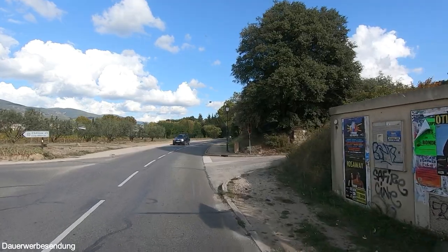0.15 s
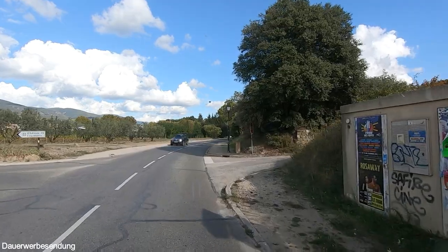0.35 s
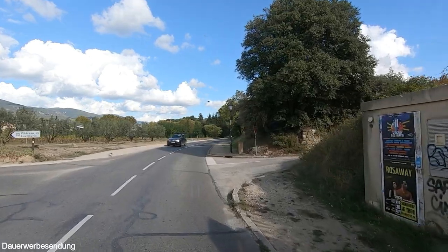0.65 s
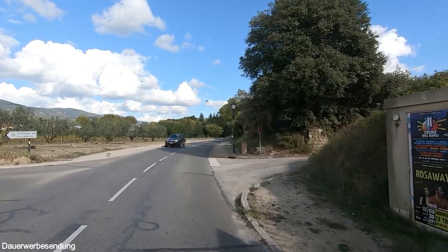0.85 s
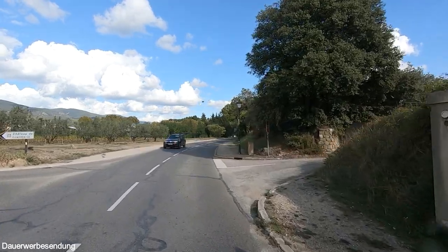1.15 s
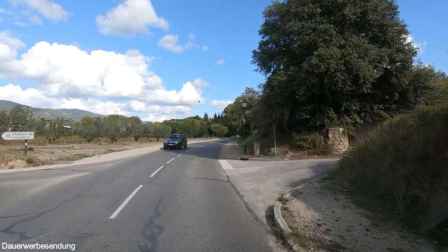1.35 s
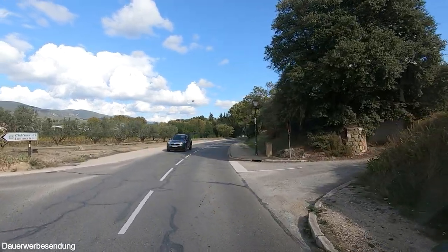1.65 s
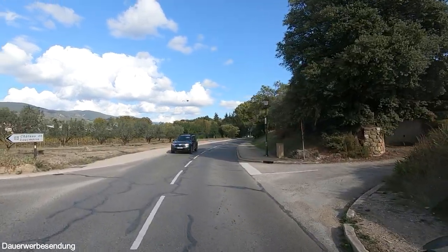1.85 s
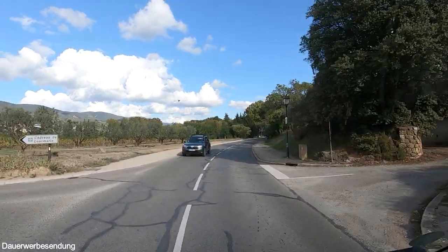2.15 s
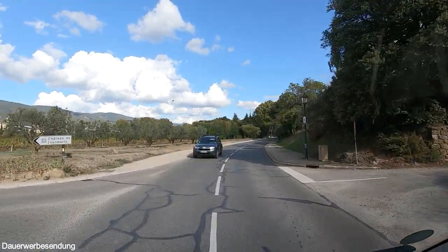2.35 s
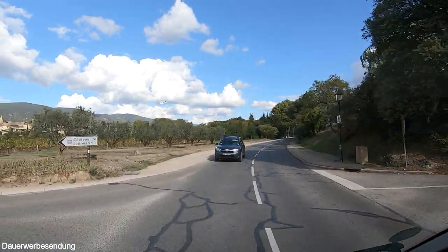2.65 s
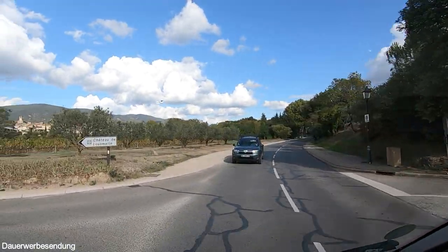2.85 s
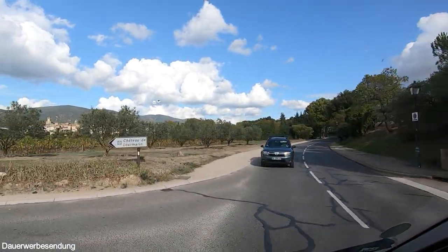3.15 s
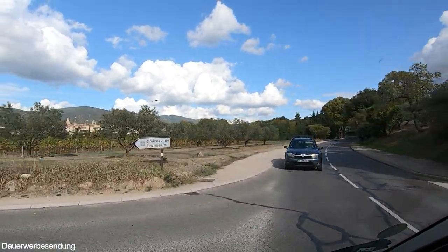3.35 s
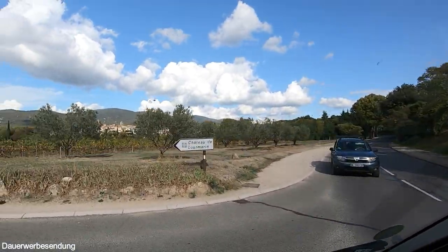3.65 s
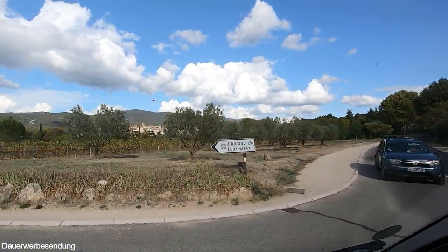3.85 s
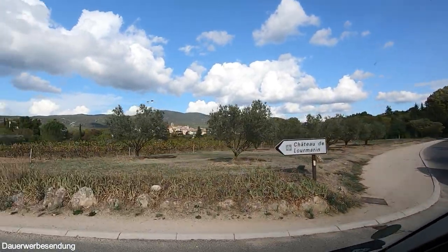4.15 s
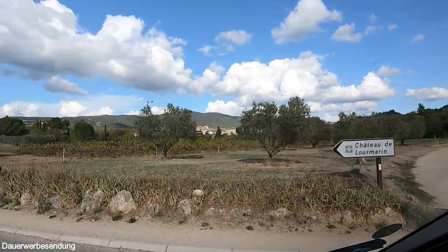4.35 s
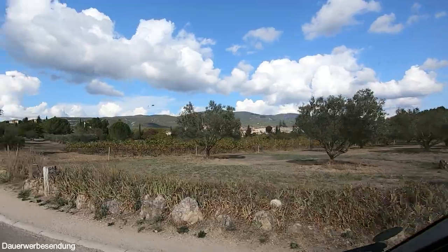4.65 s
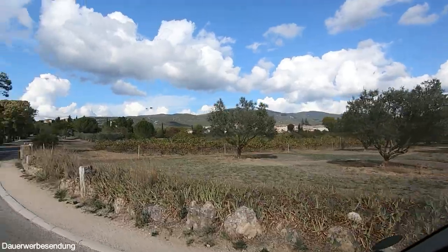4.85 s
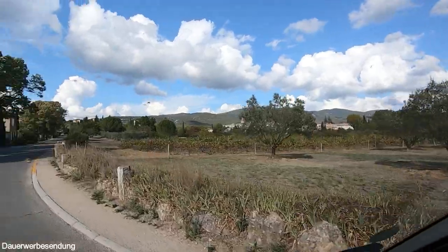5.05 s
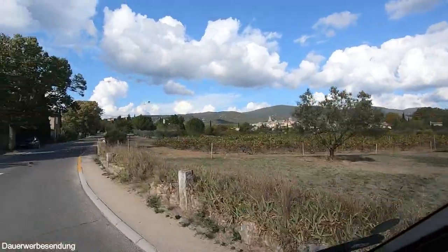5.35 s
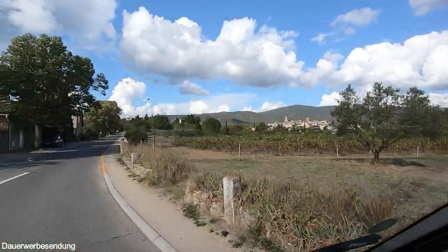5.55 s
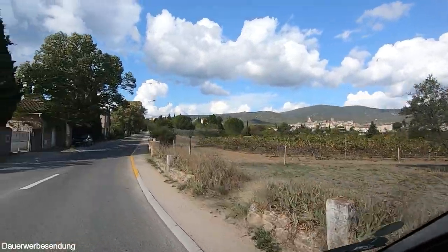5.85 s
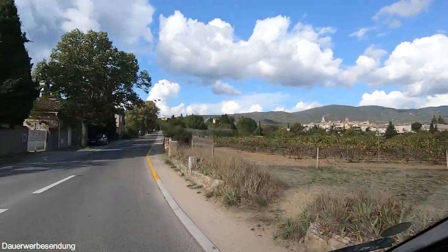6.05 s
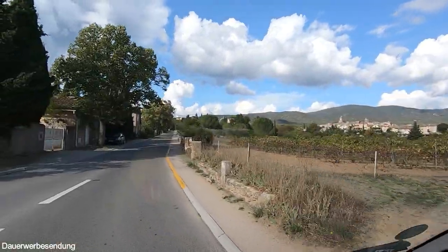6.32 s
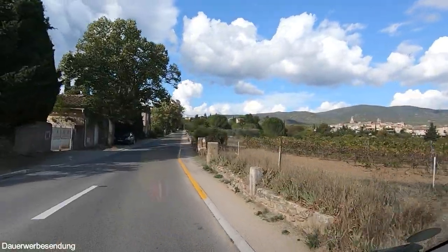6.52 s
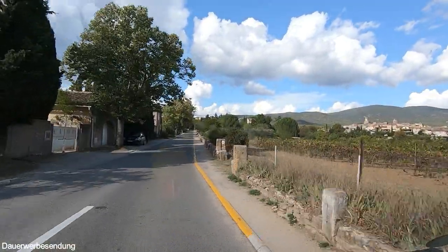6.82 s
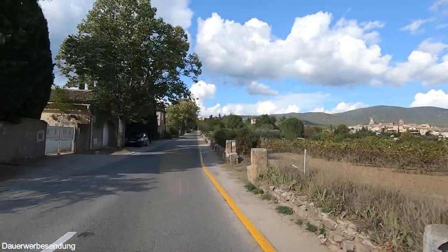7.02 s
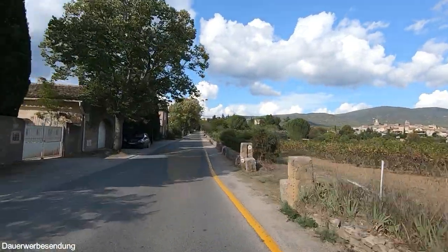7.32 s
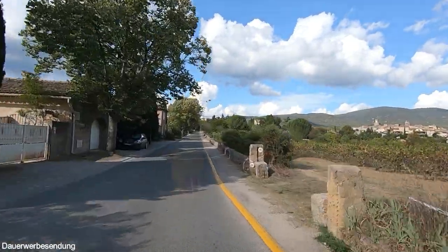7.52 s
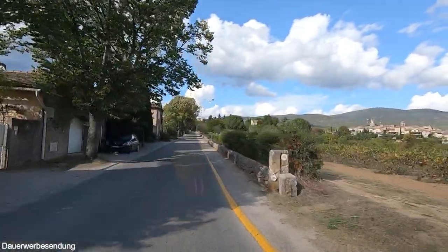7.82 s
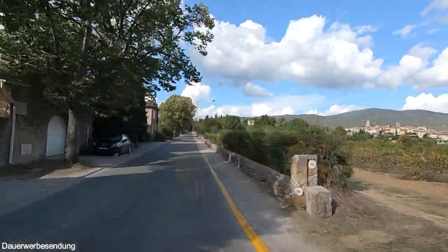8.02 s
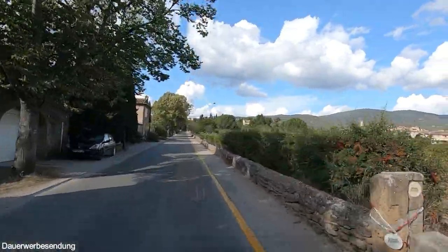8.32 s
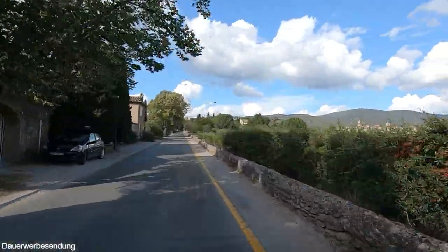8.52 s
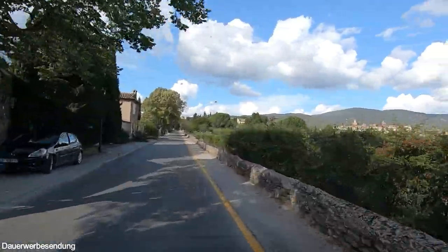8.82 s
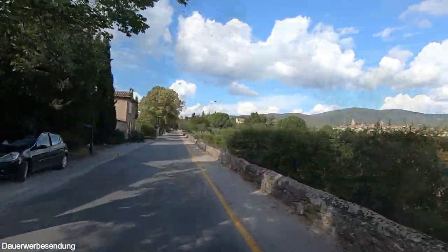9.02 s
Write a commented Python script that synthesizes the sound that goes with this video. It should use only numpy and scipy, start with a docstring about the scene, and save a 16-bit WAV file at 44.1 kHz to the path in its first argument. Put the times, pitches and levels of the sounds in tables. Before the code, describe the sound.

One close microphone in a rattling van cab. The engine pulls modestly, then coasts through a bend beneath boomy tyre rumble. Strong and weak indicator ticks alternate briskly, with loose fittings knocking and cupboards thudding, busiest before the ticking ends. Afterwards the engine climbs to a strong low growl, then drops back as bumps and road noise continue.

```python
"""Inside the cab of a van: a four-cylinder engine pulls, coasts through a bend, pulls harder, then eases off.
From the start the turn indicator, a small ringing sounder, ticks until just after five seconds.
All along, tyres roar as coloured noise, the body rocks over bumps as slow swings, and fittings rattle.
The engine is a set of tones that follow the crank. A limiter ducks everything under the largest low swings."""
import sys
import numpy as np
from scipy import signal
from scipy.io import wavfile
from scipy.ndimage import uniform_filter1d, minimum_filter1d

SR = 44100
rng = np.random.default_rng(int(sys.argv[2]) if len(sys.argv) > 2 else 0)


def to_wav(s):
    """Save 16-bit WAV."""
    ch = np.atleast_2d(s).T  # columns
    pcm = np.round(np.clip(ch, -1, 1) * 32767)  # PCM
    wavfile.write(sys.argv[1], SR, pcm.astype(np.int16))


N = 404838
T = np.arange(N) / SR

# Booms of the cab, shared by engine and tyres. Each row: centre in Hz, width in Hz, gain in dB.
CAB = [(133, 28, 7.5), (178, 26, 12), (215, 26, 13), (250, 28, 12.5), (315, 68, 8), (398, 44, 10.5),
       (508.4, 15.6, 1), (592, 50, -5), (745, 90, -8), (915, 78, -21)]

# Road noise over time. Each row: time in seconds, tyre level in dB, level of hiss and clatter in dB,
# level of the air on top in dB, lift of the rumble over the roar in dB.
ROAD = [(0, -38, -46, -59, 14), (.5, -32.5, -42.5, -58.5, 12.5), (1.02, -32, -43.5, -60.5, 7.5),
        (1.45, -31.5, -40.5, -55, 10.5), (1.7, -31, -39.5, -58, 11.5), (2.3, -30, -35.5, -55, 10),
        (2.9, -31.5, -41.5, -59, 14), (3.8, -31.5, -41, -59.5, 9), (4.35, -28.5, -38.5, -59, 6),
        (4.65, -30.5, -39.5, -53.5, 7), (5.02, -29.5, -34, -51, 10.5), (5.22, -29, -38.5, -54.5, 10.5),
        (5.8, -27.5, -38, -56.5, 4), (6.5, -28.5, -37, -55.5, 9.5), (6.85, -26.5, -36.5, -53.5, -5),
        (7.25, -27.5, -35.5, -53.5, 10.5), (7.85, -28.5, -37.5, -54, 12), (8.2, -29, -39.5, -55.5, 15),
        (8.6, -31.5, -39, -56, 13.5), (9.18, -30, -41, -62, 8.5)]
# Colour of the low tyre rumble. Each row: frequency in Hz, strength in dB per Hz.
RUMBLE = [(25, -8), (36, -6), (55, -4), (87, -13), (157, -21), (250, -20.5), (400, -24.5), (600, -36),
          (1500, -110)]
# Colour of the tyre roar. Each row: frequency in Hz, strength in dB per Hz.
ROAR = [(250, -15.5), (420, -6), (600, -1.5), (920, -4.5), (1150, -9.5), (1600, -27.5), (2500, -66),
        (5000, -110)]
# Colour of the hiss. Each row: frequency in Hz, strength in dB per Hz.
HISS = [(710, -10.5), (1200, 0), (1560, 3), (2070, -3), (2550, -4), (3220, -8), (3760, -7.5), (4750, -13.5),
        (7850, -15), (9500, -22), (12400, -53), (20900, -120)]
# Colour of the thin air on top. Each row: frequency in Hz, strength in dB per Hz.
AIR = [(7000, -21), (9500, -2.5), (11400, -5.5), (13000, -5), (15800, -7.5)]

# Steady rocking of the body on springs, axle and floor. Each row: time in seconds,
# level of the 7 Hz swing in dB, of the 19 Hz shake in dB, of the 30 Hz thud in dB.
ROCKING = [(0, -31, -33, -30), (1, -28, -32, -33), (2.3, -34, -30, -27), (3.4, -24, -26, -25),
           (4.3, -34, -25, -26), (5.6, -25, -24, -25), (6.2, -27, -17, -24), (6.6, -27, -19, -21),
           (7.8, -33, -18, -20), (8.3, -22, -18, -21), (9.18, -25, -20, -22)]
# The three middle pitches of that rocking, in Hz.
BODY_HZ = [7.0, 19.0, 30.0]
SURGE_DB = 3  # the rocking comes and goes
# Bumps set one part of the body ringing. Each row: middle in seconds, pitch in Hz,
# length in seconds, peak in dB.
BUMPS = [(0.123, 30, 0.34, -9), (0.695, 17, 0.11, -12), (1.032, 7, 0.81, -17.5), (2.629, 15.6, 0.14, -9.5),
         (2.843, 6.84, 0.81, -4), (2.944, 21.4, 0.19, -6), (3.191, 19, 0.19, -9.5), (3.296, 15.4, 0.2, -17),
         (4.575, 21, 0.15, -10), (4.598, 28, 0.17, -3), (4.704, 30, 0.059, -3.5), (4.802, 7.6, 0.68, -10),
         (4.926, 31, 0.1, -6), (4.959, 74, 0.11, -11.5), (5.01, 14, 0.17, -2.5), (5.253, 56, 0.11, -17),
         (5.19, 6.4, 0.41, -10), (5.847, 18, 0.12, -35), (6.37, 25, 0.087, 3), (6.598, 29, 0.13, -14),
         (6.939, 17, 0.056, 3), (6.963, 20, 0.2, -5.5), (7.357, 18, 0.27, -9), (7.552, 32, 0.25, -4.5),
         (7.567, 64, 0.11, -13), (7.817, 20.4, 0.16, -9.5), (8.026, 30, 0.13, -6.5), (8.072, 40, 0.16, -18),
         (8.216, 27, 0.078, -11), (8.47, 31, 0.081, -6.5), (8.783, 20, 0.14, -7.5)]

# Loose fittings knock. Each row: time in seconds, rough peak in dB, centre of the bright part in Hz,
# relative level of the low part in dB, relative level of the sharp edge in dB.
RATTLES = [(0.413, -39, 6000, -3, -16), (0.4524, -29, 7550, 6.5, -10), (0.627, -32, 4430, -10, -11),
           (0.647, -34, 4370, -10, -16), (0.697, -27, 4500, 2, -5), (0.962, -28, 5420, 0, -7),
           (1.3097, -32, 5210, 0, -16), (1.3395, -23, 6420, -4, -13), (1.765, -25.5, 6330, 1, -16),
           (2.5734, -25, 4070, -1, -14), (2.648, -40.5, 2900, 7, -18), (2.67, -38, 8000, -2, -16),
           (2.7995, -24.5, 4700, 7, -15), (2.804, -24.5, 5200, 4, -12), (3.393, -25, 6240, 1.5, -11),
           (4.2148, -35, 3960, -8, -5), (4.305, -34, 5070, -9, -22), (4.3478, -39, 2800, 13, -18),
           (4.374, -39, 6000, -4, -5), (4.392, -30.5, 4270, 1, -12), (4.5449, -30.5, 4300, 6, -14),
           (4.567, -31, 4330, -2, -14), (4.6018, -35, 4710, -5, -14), (4.6794, -34, 4710, -7, -14),
           (4.733, -34, 7440, -4, -8), (4.8215, -30.5, 5340, 0, -16), (4.8683, -27, 4010, 3, -11),
           (4.9, -35, 4880, 0, -14), (4.9475, -26.5, 7380, -2, -16), (5.0612, -21.5, 7400, 1.5, -4),
           (5.097, -24.5, 6400, -2, -7), (5.1115, -27, 4600, -6, -16), (5.1294, -28, 7290, -9, -14),
           (5.2101, -31, 4680, -10, -14), (5.253, -32, 4600, -7, -14), (5.2744, -39, 4450, -2, -14),
           (5.3564, -36, 3000, 7, -20), (5.461, -33.5, 3200, 10, -20), (5.909, -39, 4190, 3, 3),
           (6.269, -33, 8140, 6, 0), (6.2994, -40, 4383, 9, -12), (7.9331, -30, 4470, -10, -16),
           (6.9326, -29, 4200, -4, -14), (8.0242, -36, 6890, -2, -3), (8.1223, -25, 4370, -0.5, -22),
           (8.366, -25.5, 4220, 0, -19), (8.4998, -40, 5080, -10, 5), (8.9012, -37, 5320, -5, -14)]
KNOCK_CREST_DB = 7  # allowance for the peak of a knock or thud over its mean level
KNOCK_LOW_HZ = 720  # low ring shared by all knocks
# Seconds to fall by 60 dB: a whole knock, its bright centre, its sharp edge.
KNOCK_T60_S, BRIGHT_T60_S, SHARP_T60_S = 0.12, 0.054, 0.045
# Dull thuds of the cupboards. Each row: time in seconds, rough peak in dB, centre in Hz.
THUDS = [(1.094, -24, 710), (2.577, -14, 677), (4.155, -19, 520), (4.352, -25, 1300), (4.39, -24, 1500),
         (4.429, -16.5, 830), (4.461, -23, 710), (4.668, -33, 610), (4.789, -15, 524), (4.836, -19, 600),
         (4.934, -18, 620), (4.963, -15, 845), (5.161, -22, 580), (5.218, -18, 570), (5.24, -14, 560),
         (5.317, -22, 520), (5.455, -23, 610), (8.124, -23, 1100)]
THUD_T60_S, THUD_SPREAD = 0.11, 1.47  # 60 dB decay; ratio of each band edge to the centre
CLACK_S, CLACK_DB = 4.967, -23.5  # start and level of a hard plastic clack
# Ringing modes of the clack. Each row: pitch in Hz, relative level in dB, 60 dB decay in seconds.
CLACK = [(1600, -8, 0.036), (1730, 5, 0.051), (1900, -8, .03), (2480, -6, .035), (2660, 1, 0.055),
         (2990, -8, .04), (3070, 6, 0.062), (3350, -2, 0.027)]
# A panel hums for a moment. Each row: start in seconds, end in seconds,
# first pitch in Hz, last pitch in Hz, peak in dB.
HUMS = [(1.116, 1.654, 665, 657, -31), (2.85, 3.2, 665, 659, -33), (5.4, 5.8, 666, 674, -33)]
# Short rubs, squeaks and dull knocks. Each row: start in seconds, end in seconds,
# lowest Hz, highest Hz, level at the middle in dB.
SCRAPES = [(0.708, 0.822, 1500, 9000, -44), (0.711, 0.81, 4240, 5070, -44), (4.345, 4.38, 500, 2000, -36),
           (4.386, 4.401, 600, 1900, -25), (4.398, 4.5, 500, 1400, -44), (4.825, 4.983, 1500, 9000, -43),
           (4.96, 5.003, 500, 4200, -29), (5.032, 5.08, 600, 3000, -47), (5.232, 5.28, 800, 2070, -32),
           (8.102, 8.2, 350, 1400, -31), (7.91, 7.967, 500, 1490, -33), (2.53, 2.565, 11300, 11900, -43),
           (8.745, 8.775, 10600, 11500, -45), (4.883, 4.915, 1700, 2500, -34), (8.19, 8.26, 500, 1100, -32),
           (8.56, 8.61, 1900, 3200, -42)]
SLIPS_PER_S, SLIP_SPREAD_DB = 500, 3  # a rub is a run of uneven slips

# Lower modes of the indicator. Each row: pitch in Hz, relative level in dB, 60 dB decay in seconds.
SOUNDER = [(1730, -16, .04), (1810, -5, .05), (1918, -6, .05), (2028, -3.5, .05), (2148, -8, .04)]
# Its upper modes. Each row: pitch in Hz, relative level in dB, 60 dB decay in seconds.
SOUNDER_TOP = [(3526, 0, .043), (3630, -4, .04), (3830, -9, .035), (4008, -10, .03), (5500, -20, .04)]
FIRST_TICK_S, TICK_EVERY_S, TICK_COUNT = .1088, .34006, 15
STRONG_DB, WEAK_DB = -19.5, -23.5  # ticks take turns
UPPER_DB, UPPER_FOLLOWS = -26.5, .8  # upper modes of a strong tick; they weaken less than the lower
# Last ticks, as the stalk springs back. Each row: time in seconds, level in dB.
LAST_TICKS = [(5.078, -28.5), (5.1692, -23.5)]
# Two bands in which the indicator housing buzzes. Each row: lowest Hz, highest Hz.
BUZZ_HZ = [(1600, 2450), (3400, 4200)]
BUZZ_DB, BUZZ_T60_S = -12, .035  # level relative to the tick; 60 dB decay

# Engine speed. Each row: time in seconds, firings a second in Hz.
FIRING = [(0.0, 33.6), (0.55, 48.5), (0.95, 42.9), (1.2, 51.5), (1.55, 52.5), (1.9, 60.0), (2.15, 62.6),
          (2.4, 66.9), (2.9, 52.8), (3.15, 54.6), (3.3, 51.9), (3.45, 40.3), (3.8, 38.4), (4.1, 42.1),
          (4.6, 44.3), (4.85, 45.5), (5.05, 49.8), (5.55, 51.3), (6.1, 57.8), (6.7, 67.3), (7.6, 79.9),
          (7.9, 82.7), (8.1, 76.0), (8.3, 71.7), (8.5, 63.4), (8.95, 54.3), (9.18, 56.8)]
# Cylinders differ, so growl lines stand at quarters of the firing rate.
# Each row: multiple of the firing rate, relative level in dB.
GROWL = [(1.75, 1), (2.25, 0), (2.5, -3.5), (2.75, 0), (3, -.5), (3.25, -5.5), (3.5, -1), (3.75, -3),
         (4, -2), (4.25, -1.5), (4.5, -2.5), (4.75, -6), (5, -3), (5.5, -3), (5.75, -4.5), (6, -4),
         (6.75, -10), (7, -5), (7.75, -4), (8, -1.5), (8.25, -2), (8.75, -5), (9, -6.5), (9.5, -6),
         (10, -4), (10.5, 4), (11, -2), (12, -4)]
# Engine load. Each row: time in seconds, growl level in dB, tone at the firing rate in dB.
LOAD = [(0, -56, -34), (.6, -46, -32), (1.1, -47, -27), (1.7, -45, -31), (2.1, -37, -22),
        (2.5, -39.5, -16.5), (2.85, -47, -24), (3.3, -45.5, -30), (3.5, -42, -19), (4.1, -45, -22),
        (4.6, -45, -22), (4.8, -45, -31), (5.6, -43.5, -31), (5.9, -41, -30), (6.25, -41, -25),
        (6.5, -37, -13.5), (7.1, -32.5, -14), (7.9, -33.5, -17), (8.08, -42, -20), (8.45, -42, -14.5),
        (8.8, -45, -26), (9.18, -45, -30)]
# Tone at twice the firing rate. Each row: time in seconds, level in dB.
SECOND = [(0, -32.5), (.5, -27), (1.1, -30), (1.9, -23.5), (2.4, -24.5), (2.9, -31), (3.4, -24), (3.9, -31),
          (4.5, -24.5), (5.3, -30), (5.7, -28.5), (6.5, -16.5), (7, -21), (7.5, -37), (8.4, -33),
          (8.8, -24), (9.18, -24.5)]
WAVER_DB = 1.5  # both tones waver
# Below this growl level, lines between whole multiples fade faster, by this share.
FULL_LOAD_DB, UNEVEN = -37, .45

EDGE_HZ = 15745  # upper limit of the sound


def amp(db):
    """Turns dB into a gain."""
    return 10 ** (np.asarray(db) / 20)


def evened(x):
    """Scales a sound to a mean (rms) level of 1."""
    return x / np.sqrt(np.mean(x ** 2) + 1e-20)


def curves(rows):
    """Draws each column of a table as a curve over all samples."""
    times, *columns = np.transpose(rows)
    return [np.interp(T, times, column) for column in columns]


def add(mix, start_s, sound):
    """Mixes a sound in at a given time, cutting what runs past the end."""
    part = mix[round(start_s * SR):][:len(sound)]
    part += sound[:len(part)]


def drift(top_hz):
    """Slow random wander of rms 1: twelve sines up to top_hz, the slower the stronger."""
    t = T[::128]
    rates = top_hz * np.geomspace(1 / 10, 1, 12)
    slow = sum(np.sin(2 * np.pi * (f * t + rng.random())) / np.sqrt(f) for f in rates)
    return np.interp(T, t, evened(slow))


def band(x, lo_hz, hi_hz):
    """Gently keeps only one band of frequencies."""
    edges = np.clip([lo_hz, hi_hz], 20, SR / 2 - 2000)
    return signal.sosfilt(signal.butter(2, edges, "band", fs=SR, output="sos"), x)


def cab(hz):
    """Gain of the cab: air resonances boom at certain pitches over a weak even path."""
    booms = sum(amp(db) / (1 + (2 * (hz - centre) / width) ** 2) for centre, width, db in CAB)
    return amp(-20) + booms


def noise(points, patchy_db, boom, size):
    """Random short-time spectra of a given colour, with drifting patches and a share of the booms."""
    hop = size // 4
    hz = np.fft.rfftfreq(size, 1 / SR)
    real, imaginary, patches = rng.standard_normal((N // hop + 5, len(hz), 3)).T
    patches = uniform_filter1d(patches, size=12, axis=0)  # across frequency
    patches = evened(uniform_filter1d(patches, size=10, axis=1))  # across time
    point_hz, point_db = np.transpose(points)
    colour = amp(np.interp(np.log(hz + 1), np.log(point_hz + 1), point_db)) * cab(hz) ** boom
    spectra = (real + 1j * imaginary) * colour[:, None] * amp(patchy_db * patches)
    return evened(signal.istft(spectra, nperseg=size, noverlap=size - hop)[1][:N])


def ring(modes, t, rise_s, flip):
    """Dying modes with a soft start; flip = -1 starts neighbours in opposite phase."""
    tones = (flip ** k * amp(db - 60 * t / t60) * np.sin(2 * np.pi * hz * t)
             for k, (hz, db, t60) in enumerate(modes))
    return (1 - np.exp(-t / rise_s)) * sum(tones)


def grit(count):
    """Friction: sparse slips of uneven size over a little smooth noise."""
    slips = (rng.random(count) < SLIPS_PER_S / SR) * amp(SLIP_SPREAD_DB * rng.standard_normal(count))
    return evened(slips * rng.choice([-1, 1], count)) + 0.74 * rng.standard_normal(count)


def road(turns):
    """Rumble and roar of the tyres, a hiss partly chopped by each firing, and thin air on top."""
    tyres_db, hiss_db, air_db, lift_db = curves(ROAD)
    tyres = amp(lift_db) * noise(RUMBLE, patchy_db=1.5, boom=0.3, size=2048)
    tyres += noise(ROAR, patchy_db=1.06, boom=0.35, size=2048)
    chop = 1 + 0.049 * np.cos(2 * np.pi * turns) + 0.034 * np.cos(4 * np.pi * turns)
    hiss = amp(hiss_db) * chop * noise(HISS, patchy_db=1.04, boom=0, size=512)
    hiss += amp(air_db) * noise(AIR, patchy_db=1.0, boom=0, size=512)
    flicker = amp(0.23 * drift(22))
    return amp(tyres_db) * tyres + flicker * hiss


def body():
    """Three low resonances of wavering pitch and strength, and bumps that add short swings of their own."""
    out = np.zeros(N)
    for level_db, middle_hz in zip(curves(ROCKING), BODY_HZ):
        surge = amp(SURGE_DB * drift(6))
        hz = middle_hz * (1 + 0.1365 * drift(4))
        out += np.sqrt(2) * amp(level_db) * surge * np.sin(2 * np.pi * np.cumsum(hz) / SR)
    for middle_s, hz, length_s, db in BUMPS:
        t = np.arange(0, length_s, 1 / SR)
        fade = signal.windows.tukey(len(t), .6)
        swing = amp(db) * fade * np.cos(2 * np.pi * hz * (t - length_s / 2))
        start_s = middle_s - length_s / 2
        # a bump that begins before time zero loses its first part
        add(out, max(start_s, 0), swing[round(max(-start_s, 0) * SR):])
    return out


def knocks():
    """Bursts of noise: a bright centre and a sharp edge die quickly, a low ring lasts longer."""
    out, t = np.zeros(N), np.arange(6000) / SR
    # the shared decay comes last, so the faster parts get only their extra decay first
    bright_extra_db = -60 * t * (1 / BRIGHT_T60_S - 1 / KNOCK_T60_S)
    sharp_extra_db = -60 * t * (1 / SHARP_T60_S - 1 / KNOCK_T60_S)
    for s, db, hz, low_db, sharp_db in RATTLES:
        a, b, c, d = rng.standard_normal((4, len(t)))
        tone = evened(band(a, hz * .9, hz * 1.11)) * amp(bright_extra_db)
        tone += evened(band(b, 3500, 9500)) * .6
        tone += amp(sharp_db + sharp_extra_db) * evened(band(b[::-1], 7100, 15000))
        low = evened(band(c, 550, 3440)) * 0.94
        low += evened(band(d, KNOCK_LOW_HZ - 90, KNOCK_LOW_HZ + 110)) * 0.98
        tone += amp(low_db) * low
        decay = amp(db - KNOCK_CREST_DB - 60 * t / KNOCK_T60_S)
        add(out, s - .001, decay * (1 - np.exp(-t / .0012)) * tone)
    return out


def thuds():
    """Dull cupboard thuds: each is a dying burst of noise in one band."""
    out, t = np.zeros(N), np.arange(6000) / SR
    for s, db, hz in THUDS:
        dull = evened(band(rng.standard_normal(len(t)), hz / THUD_SPREAD, hz * THUD_SPREAD))
        decay = amp(db - KNOCK_CREST_DB - 60 * t / THUD_T60_S)
        add(out, s - .001, decay * (1 - np.exp(-t / 0.001)) * dull)
    return out


def fittings():
    """Loose parts strike as knocks, thuds and a clack; a panel hums as a gliding tone; scrapes rub."""
    out, t = knocks() + thuds(), np.arange(6000) / SR
    add(out, CLACK_S, amp(CLACK_DB) * ring(CLACK, t, rise_s=0.0008, flip=-1))
    for start_s, end_s, first_hz, last_hz, db in HUMS:
        count = round((end_s - start_s) * SR)
        jitter = uniform_filter1d(rng.standard_normal(count), size=60)
        hz = np.linspace(first_hz, last_hz, count) * (1 + 0.036 * jitter)
        add(out, start_s, amp(db) * np.hanning(count) * np.sin(2 * np.pi * np.cumsum(hz) / SR))
    for start_s, end_s, lo_hz, hi_hz, db in SCRAPES:
        count = round((end_s - start_s) * SR)
        add(out, start_s, amp(db) * np.hanning(count) * evened(band(grit(count), lo_hz, hi_hz)))
    return out


def indicator():
    """The same small sounder rings every time, strong and weak in turn, with echoes off dash and glass."""
    t = np.arange(3000) / SR
    steady = [(FIRST_TICK_S + k * TICK_EVERY_S, WEAK_DB if k % 2 else STRONG_DB) for k in range(TICK_COUNT)]
    clicks = np.zeros((2, N))  # one train for the lower modes, one for the upper
    for s, db in steady + LAST_TICKS:
        upper_db = UPPER_DB + UPPER_FOLLOWS * (db - STRONG_DB)
        clicks[:, round(s * SR)] = amp([db, upper_db])
    lower = ring(SOUNDER, t, rise_s=.0015, flip=1)
    upper = ring(SOUNDER_TOP, t, rise_s=.001, flip=1)
    direct = signal.oaconvolve(clicks, [lower, upper], axes=1).sum(0)[:N]
    for train, (lo_hz, hi_hz) in zip(clicks, BUZZ_HZ):
        buzz = evened(band(band(rng.standard_normal(len(t)), lo_hz, hi_hz), lo_hz, hi_hz))
        buzz *= amp(BUZZ_DB - 60 * t / BUZZ_T60_S) * np.minimum(t / 0.00077, 1)
        direct += signal.oaconvolve(train, buzz)[:N]
    out = direct.copy()
    for delay_s, db in [(.00443, -3), (.00938, -4), (.0138, -8), (.0219, -17)]:
        add(out, delay_s, amp(db) * direct)
    return out


def engine():
    """Lines tied to the crank; each growl line swells as it slides through a boom of the cab."""
    hz, = curves(FIRING)
    growl_db, first_db = curves(LOAD)
    second_db, = curves(SECOND)
    turns = np.cumsum(hz * (1 + .001 * drift(5))) / SR  # firings so far
    light_load_db = np.minimum(growl_db - FULL_LOAD_DB, 0)
    growl = np.zeros(N)
    for multiple, db in GROWL:
        between = multiple % 1 > 0
        level = amp(db + 1.8 * drift(2) + between * UNEVEN * light_load_db)
        boom = np.interp(T, T[::128], cab(multiple * hz[::128]))
        growl += boom * level * np.cos(2 * np.pi * (multiple * turns + rng.random()))
    first = amp(first_db + WAVER_DB * drift(4.4)) * np.cos(2 * np.pi * turns)
    second = amp(second_db + WAVER_DB * drift(4)) * np.cos(4 * np.pi * turns + 1)
    return np.sqrt(2) * (first + second + amp(growl_db) * growl), turns


def scene():
    """Adds all sources at one microphone; the engine comes first because its firings chop the hiss."""
    motor, turns = engine()
    return (road(turns) + body() + fittings() + indicator() + motor)[None]


def record(dry):
    """A limiter turns down peaks over full scale and recovers steadily; then the highest treble is cut."""
    recovery_db = T * 110.  # 110 dB a second
    over_db = np.maximum(20 * np.log10(abs(dry[0]) + 1e-9), 0)
    ahead_db = -minimum_filter1d(-over_db, size=881)  # largest excess within 10 ms either way
    held_db = np.maximum.accumulate(ahead_db + recovery_db) - recovery_db
    limited = np.clip(dry / amp(uniform_filter1d(held_db, size=221)), -1, 1)
    low_pass = signal.firwin(2047, EDGE_HZ, window=("kaiser", 9), fs=SR)
    return signal.oaconvolve(limited, low_pass[None], "same")


dry = scene()
out = record(dry)
to_wav(out)
```